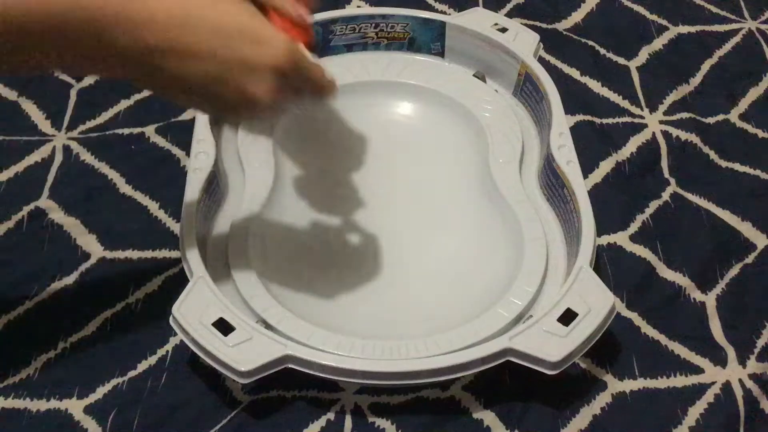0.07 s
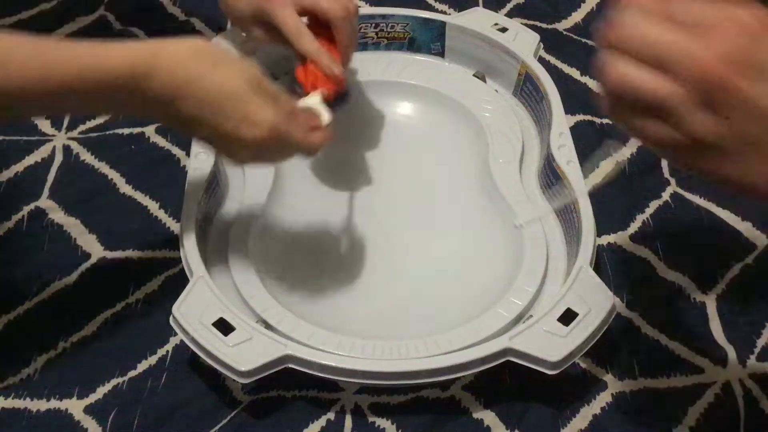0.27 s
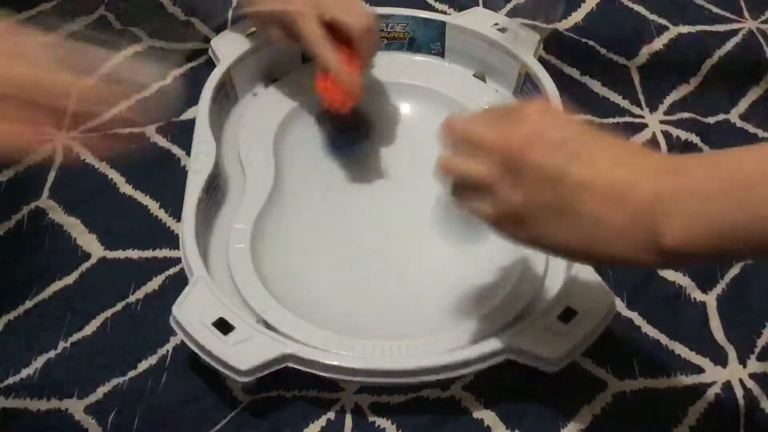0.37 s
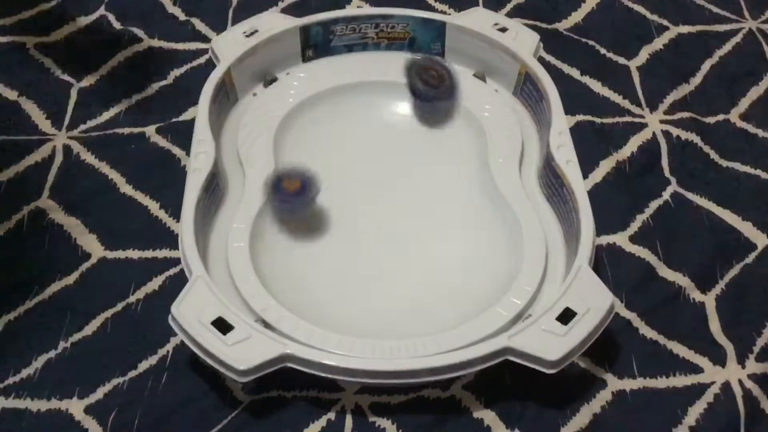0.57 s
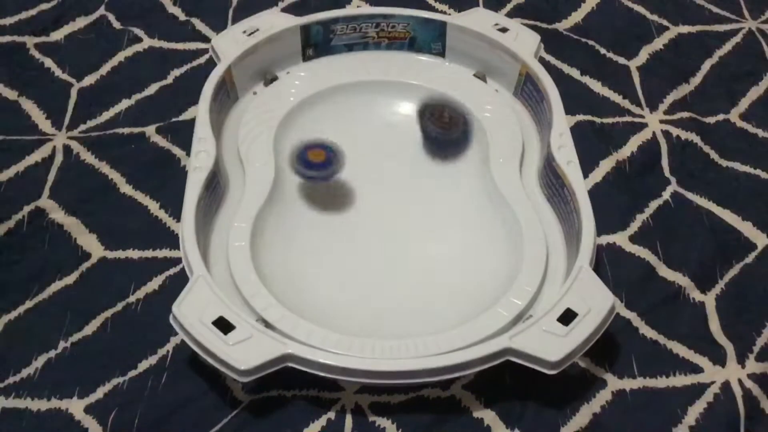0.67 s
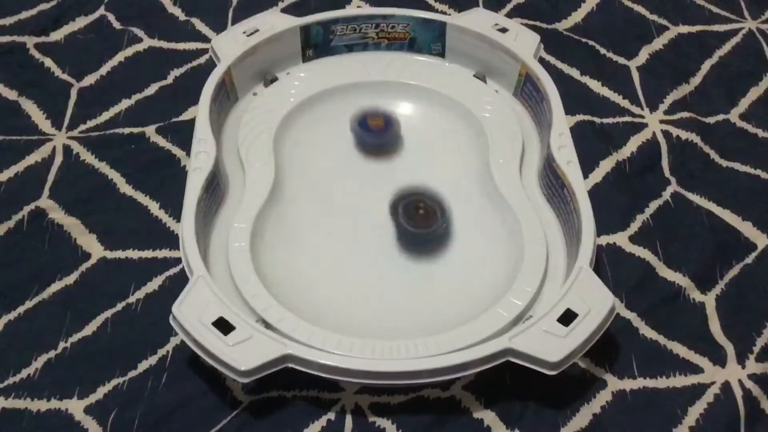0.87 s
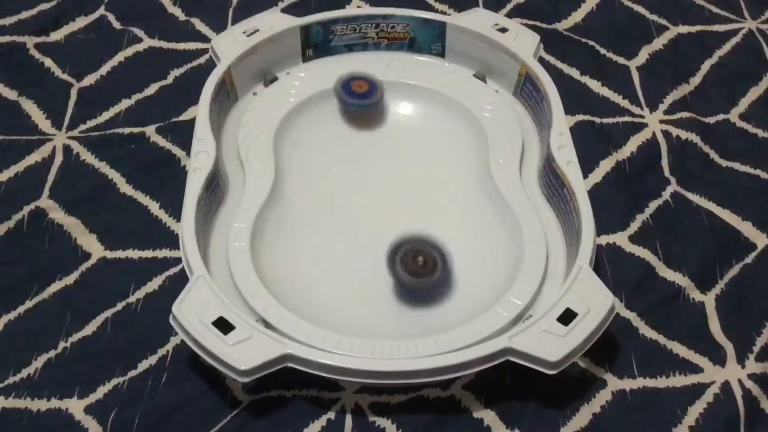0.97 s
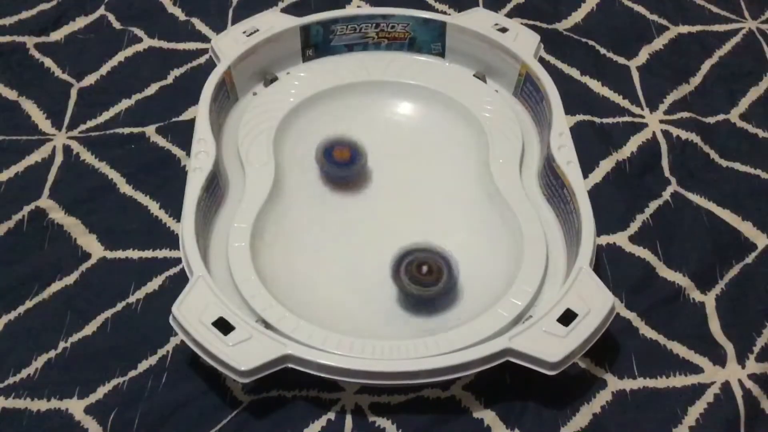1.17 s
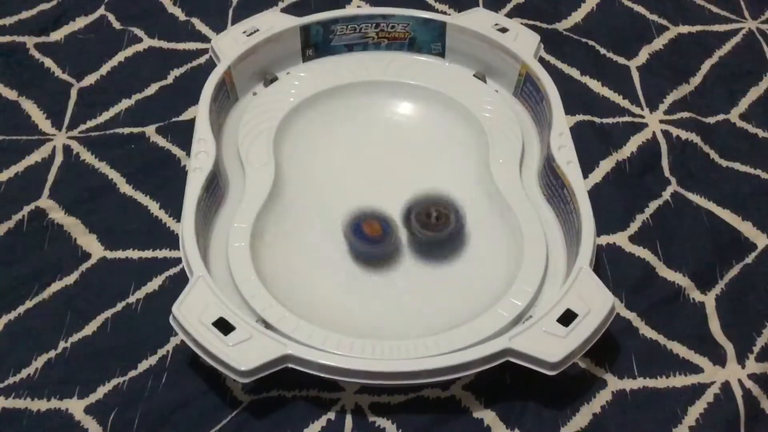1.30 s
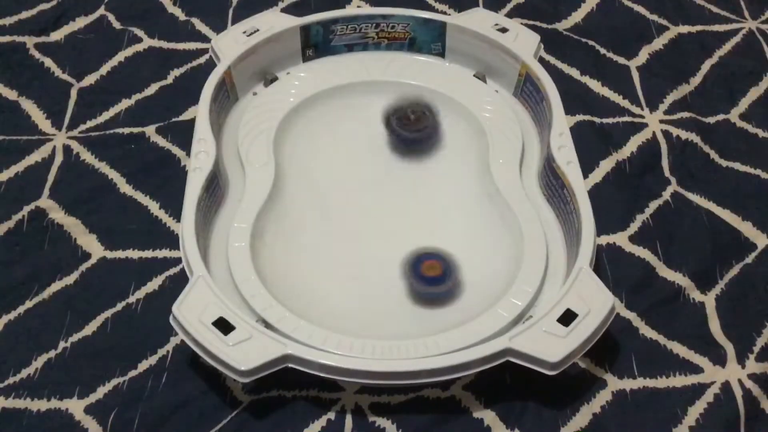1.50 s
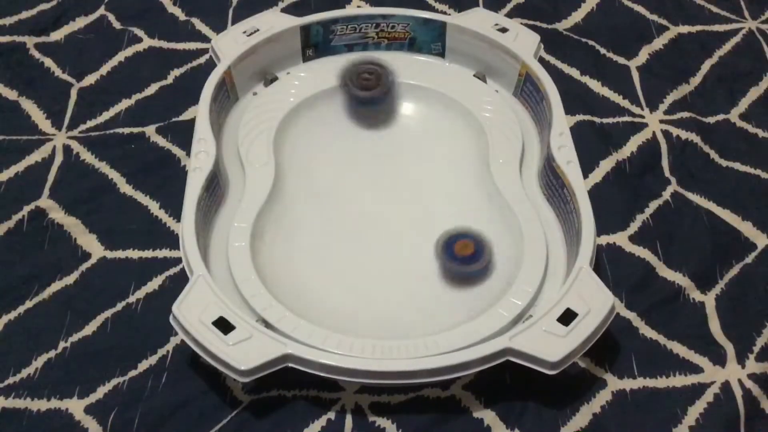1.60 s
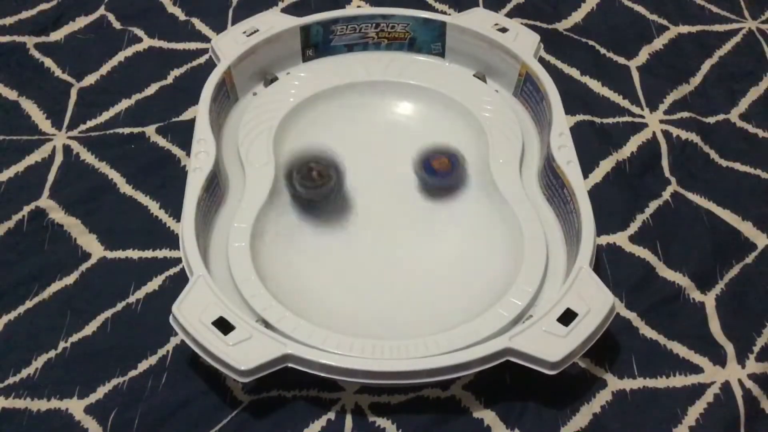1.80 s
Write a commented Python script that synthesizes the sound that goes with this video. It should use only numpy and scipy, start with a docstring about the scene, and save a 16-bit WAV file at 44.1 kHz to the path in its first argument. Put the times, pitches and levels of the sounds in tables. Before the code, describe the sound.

Two toy tops clatter into a plastic bowl after a ripcord rasp, spinning and knocking together.

```python
"""Two toy tops are ripped from their launchers into a thin plastic arena on a cloth, in a small room.
The ripcords rasp over their gears, faster and louder, and the arena takes two big, dull bumps.
The tops land and bounce, ringing the floor of the bowl, and a launcher's catch snaps once.
Then the tips rumble, scratch and skid round the bowl, with softer bumps underneath,
while the tops clack against each other and the wall."""
import sys
import numpy as np
from scipy import signal
from scipy.fft import rfft, irfft
from scipy.io import wavfile
from scipy.ndimage import uniform_filter1d

SR = 44100
rng = np.random.default_rng(int(sys.argv[2]) if len(sys.argv) > 2 else 0)


def master_out(mix):
    """Clip the mix to full scale and print it as 16-bit PCM to the path in sys.argv[1]."""
    frames = np.transpose(np.atleast_2d(mix))
    ceiling = np.clip(frames, -1, 1)
    pcm = np.round(ceiling * 32767).astype(np.int16)
    wavfile.write(sys.argv[1], SR, pcm)


N = 81585
TIME = np.arange(N) / SR
HIT_TIME = np.arange(SR // 2) / SR  # seconds within one hit and its decay

# Bright spectrum of hard contact on plastic: frequency_hz, level_db
TICK_SPECTRUM = [(500, -38), (2500, 11), (5300, 5.5), (16000, -14.5)]


def clacks():
    """Each blow ticks, rings a top and sends a falling bending wave through the wall and back."""
    # Blows of the tops: start_s, top_db, wall_db, tick_db, top_pitch_ratio
    blows = [(0.316, -12, -16.5, -15, 0.94), (.391, -26, -28, -30, 0.82), (0.4415, -21.5, -21.5, -49, 1.17),
             (0.4439, -19.5, -21.5, -29, 1.23), (.466, -28, -36, -40, 1.27), (0.4752, -18.5, -19, -57, 0.8),
             (0.49, -22, -25, -24.5, 1), (0.497, -17, -15.5, -24.5, .95), (.515, -27, -20, -55, 1.4),
             (.560, -15, -13, -20.5, 1.13), (0.568, -12, -24.5, -16, 1.05), (.573, -23, -16, -19, 1.61),
             (.583, -29, -15, -20.5, 1), (0.899, -14.5, -36, -30, 1), (.9022, -14, -10, -48, 0.74),
             (.949, -9.5, -19.5, -25.5, 0.93), (0.954, -36, -17.5, -33, 0.94),
             (1.5007, -24.5, -23, -32, 0.94), (1.5269, -20, -29.5, -43, 0.98),
             (1.535, -24.5, -26, -28.5, 1.12), (1.5619, -22, -29.5, -29, 1.21)]
    # Modes of a top: pitch_hz, level_db, t60_s
    top_modes = [(2234, -3, 0.021), (2897, 5.5, 0.011), (3640, -8, 0.012), (5380, -15, 0.013)]
    # Modes of the arena wall: pitch_hz, level_db, t60_s
    wall_modes = [(1145, 9, 0.048), (1207.6, 10, 0.038), (1640, 0, 0.093), (2162, -9, 0.1)]
    # Tone of the wall's bending wave and dense ringing: frequency_hz, level_db
    wall_spectrum = [(60, -38), (220, -2), (1300, 0), (2400, -2.5), (3600, -9.5), (5000, -20),
                     (16000, -57.5)]
    travel_s, rim_delay_s = 0.001536, 0.002207  # travel time at 1 kHz; treble arrives first
    size = len(HIT_TIME)
    hz = np.fft.rfftfreq(size, 1 / SR)
    direct = np.exp(-4j * np.pi * travel_s * np.sqrt(1000 * hz))
    rim_echo = amp(-9) * direct ** 2 * np.exp(-2j * np.pi * hz * rim_delay_s)  # smeared twice as long
    bend = crest(irfft(rfft(response(wall_spectrum), size) * (direct + rim_echo), size))
    wall_ring = amp(-10.5) * ring(wall_modes)
    attack = 1 - np.exp(-HIT_TIME / 0.00094)
    out = np.zeros(N)
    for start_s, top_db, wall_db, tick_db, pitch_ratio in blows:
        wash = amp(-5.5) * burst(wall_spectrum, t60_s=0.092) * attack
        add(out, start_s - 0.001, amp(wall_db) * (bend + wall_ring + wash))
        top = ring(top_modes, pitch_ratio, rise_s=0.00061)
        tick = crest(burst(TICK_SPECTRUM, t60_s=0.016) * attack)
        add(out, start_s, amp(top_db) * top + amp(tick_db) * tick)
    return out


def ripcords():
    """Gear teeth scuff the cord, faster and louder on a harder pull; the housing colours the rasp."""
    # Strength of the pull: time_s, level_db
    pull = [(.136, -96), (.139, -52), (.148, -64), (.172, -59.5), (.183, -47), (.233, -34), (.236, -25),
            (.27, -25), (.273, -16), (.303, -15.5), (.318, -22), (.35, -37), (.38, -110)]
    # Tone of the launcher housing: frequency_hz, level_db
    housing_spectrum = [(150, -28.5), (1800, -26), (2550, -7.5), (3700, -7), (4300, -10), (6600, -10),
                        (7900, -8.5), (8700, -14), (16000, -19)]
    peak_teeth_per_s, db_per_doubling = 370, 19.5
    tooth_spread_db, tooth_t60_s, cord_rub = 9.5, 0.016, 0.97
    pull_db = curve(pull)
    teeth_per_s = peak_teeth_per_s * 2 ** ((pull_db - pull_db.max()) / db_per_doubling)
    clicks = np.diff(np.floor(np.cumsum(teeth_per_s) / SR), prepend=0)
    teeth = clicks * np.sqrt(SR / teeth_per_s) * amp(tooth_spread_db * (2 * rng.random(N) - 1.5))
    scuff = np.exp(-2 * np.log(1000) * HIT_TIME / tooth_t60_s)
    power = abs(signal.fftconvolve(teeth ** 2, scuff / scuff.sum())[:N]) + cord_rub ** 2
    friction = rng.standard_normal(N) * np.sqrt(power) * amp(pull_db)
    housing = response(housing_spectrum)
    rasp = signal.fftconvolve(friction, housing / np.linalg.norm(housing))[:N]
    return resonant(rasp, hz=7320, width_hz=210, db=-11)  # the gear case sings under the rasp


def bumps():
    """Soft blows shake the whole arena and hold no treble."""
    # Dull bumps: start_s, level_db, pitch_ratio
    blows = [(0.275, -24.5, 0.33), (0.309, -5, 0.87), (0.3603, -4.5, 0.93), (0.613, -21, 0.95),
             (0.657, -16.5, 0.65), (1.115, -25, 0.63), (1.157, -21.5, 0.58), (1.574, -18, 0.845)]
    # Modes of the whole arena: pitch_hz, level_db, t60_s
    arena_modes = [(105.2, -14, 0.48), (168.6, 9, 0.029), (249.6, 14.5, 0.021), (321, 6, 0.033),
                   (498, 1, 0.083), (650, 2, 0.058)]
    out = np.zeros(N)
    for start_s, level_db, pitch_ratio in blows:
        add(out, start_s, amp(level_db) * ring(arena_modes, pitch_ratio, rise_s=0.0014))
    return signal.sosfilt(signal.butter(8, 730, "lowpass", fs=SR, output="sos"), out)


def landings():
    """The falling tips strike the floor of the bowl and ring it."""
    # Strikes of the tips: start_s, level_db, pitch_ratio
    strikes = [(.498, -13, 0.96), (.5605, -16, .89)]
    # Modes of the floor: pitch_hz, level_db, t60_s
    floor_modes = [(658, -3.5, 0.17), (686, 2.5, 0.055), (820, -16, 0.032)]
    out = np.zeros(N)
    for start_s, level_db, pitch_ratio in strikes:
        add(out, start_s, amp(level_db) * ring(floor_modes, pitch_ratio, rise_s=0.0011))
    return out


def snap():
    """A launcher's catch lets out one bright plastic snap."""
    # Tone of the catch: frequency_hz, level_db
    catch_spectrum = [(200, -21.5), (2300, -11), (2750, 6.5), (3550, 2), (4100, -2), (7500, 0), (16000, -8)]
    out = np.zeros(N)
    add(out, start_s=0.756, sound=amp(-13.5) * burst(catch_spectrum, t60_s=0.016))
    return out


def rolling():
    """The spinning tips jolt the bowl, scratch once per turn and tick over grit."""
    # Levels of the running tips: time_s, rumble_db, scratch_db
    levels = [(.25, -62, -100), (.4, -27, -43), (.62, -33.5, -49.5), (.76, -34.5, -49), (.88, -33, -46.5),
              (1.02, -30, -47.5), (1.1, -39.5, -52), (1.27, -41, -54.5), (1.39, -36, -52),
              (1.48, -27.5, -48.5), (1.6, -30.5, -48), (1.77, -40.5, -53.5), (1.83, -28, -49)]
    # Low rumble of the bowl: frequency_hz, level_db
    rumble_spectrum = [(48, -21), (80, 1), (125, 2.5), (230, -5), (390, -12.5), (620, -15), (800, -39),
                       (2000, -52)]
    # Scratch of a tip on plastic: frequency_hz, level_db
    scratch_spectrum = [(900, -0.5), (1220, 7.5), (1550, -3.5), (2800, -0.5), (7500, -18.5), (16000, -27)]
    spin_hz, spin_depth, jolt_share, grit_db = 54.1, 0.52, 0.53, -11.5
    jolts = unit(colour(sparse(per_s=63, spread_db=3), rumble_spectrum))
    smooth_roll = unit(colour(rng.standard_normal(N), rumble_spectrum))
    rumble = unit(jolt_share * jolts + (1 - jolt_share) * smooth_roll)
    wander = unit(uniform_filter1d(rng.standard_normal(N), size=1500))
    turns = np.cumsum(spin_hz * (1 + 0.2 * wander)) / SR
    flutter = np.exp(spin_depth * np.cos(2 * np.pi * turns))
    scratch = unit(colour(rng.standard_normal(N) * flutter, scratch_spectrum))
    grains = sparse(per_s=200, spread_db=4)
    grit = unit(signal.fftconvolve(grains, burst(TICK_SPECTRUM, t60_s=0.0062))[:N])
    return amp(curve(levels)) * rumble + amp(curve(levels, column=2)) * (scratch + amp(grit_db) * grit)


def skids():
    """A tip catches on the plastic in short, dry scrapes."""
    # Scrapes: start_s, level_db
    scrapes = [(0.6524, -45), (0.678, -37), (0.7083, -44.5), (1.1154, -45.5), (1.155, -45.5), (1.16, -45.5),
               (1.335, -48.5), (1.4494, -44), (1.4765, -39.5), (1.8107, -48)]
    out = np.zeros(N)
    for start_s, level_db in scrapes:
        add(out, start_s, amp(level_db) * burst(TICK_SPECTRUM, t60_s=0.02))
    return out


def room(x, tails=3, crossfade_hz=7.14):
    """Several echo tails crossfade in turn, so the room's short reverb sounds smooth and even."""
    feeds = [np.cos(np.pi * (crossfade_hz * TIME + k / tails)) * np.sqrt(2 / tails)
             for k in range(tails)]
    return sum(signal.fftconvolve(x * feed, room_tail())[:N] for feed in feeds)


def room_tail():
    """One short echo tail of a furnished room, made of decaying noise."""
    # Reverb decay: frequency_hz, t60_s
    decay_times = [(200, 0.21), (3000, 0.21), (16000, 0.19)]
    # Reverb send: frequency_hz, level_db
    send = [(100, -14), (700, -3), (2500, -10.5), (16000, -3.5)]
    hz, t, bands = signal.stft(rng.standard_normal(len(HIT_TIME)), SR, nperseg=256)
    t60_s = read(decay_times, hz)[:, None]
    decay = np.exp(-np.log(1000) * t / t60_s) * np.sqrt(2 * np.log(1000) / (t60_s * SR))  # unit energy
    bands = bands * decay * amp(read(send, hz))[:, None]
    tail = signal.istft(bands, SR, nperseg=256)[1][:len(HIT_TIME)]
    return tail * (1 - np.exp(-HIT_TIME / 0.0015))


def air():
    """The room's still air is a faint, low bed of noise."""
    # Room tone: frequency_hz, level_db
    air_spectrum = [(20, -20.5), (68, 2), (500, -19), (2500, -31.5), (16000, -57.5)]
    return amp(-51) * unit(colour(rng.standard_normal(N), air_spectrum))


def ring(modes, pitch_ratio=1, rise_s=0.0009):
    """Modes struck together, each dying at its own speed."""
    waves = sum(amp(db - 60 * HIT_TIME / t60_s) * np.sin(2 * np.pi * hz * pitch_ratio * HIT_TIME)
                for hz, db, t60_s in modes)
    return crest(waves * (1 - np.exp(-HIT_TIME / rise_s)))


def burst(spectrum, t60_s):
    """Countless modes dying together as a puff of noise."""
    decay = np.exp(-np.log(1000) * HIT_TIME / t60_s)
    return crest(colour(rng.standard_normal(len(HIT_TIME)) * decay, spectrum))


def sparse(per_s, spread_db):
    """Random clicks of uneven size."""
    return (rng.random(N) < per_s / SR) * amp(spread_db * np.minimum(rng.exponential(1, N), 3))


def resonant(x, hz, width_hz, db):
    """Adds one narrow resonance to a sound."""
    return x + amp(db) * signal.lfilter(*signal.iirpeak(hz, hz / width_hz, fs=SR), x)


def colour(x, spectrum):
    """Filters a sound by a spectrum."""
    return signal.fftconvolve(x, response(spectrum))[:len(x)]


def response(spectrum, size=4096):
    """Causal impulse response with the given spectrum."""
    log_gain = np.log(amp(read(spectrum, abs(np.fft.fftfreq(size, 1 / SR)))))
    return np.fft.ifft(np.exp(np.conj(signal.hilbert(log_gain)))).real[:size // 2]


def read(points, hz):
    """Reads a table on a log-frequency axis."""
    point_hz, value = np.transpose(points)
    return np.interp(np.log(hz + 1), np.log(point_hz + 1), value)


def curve(rows, column=1):
    """Reads one column of a control curve at every sample."""
    rows = np.array(rows)
    return np.interp(TIME, rows[:, 0], rows[:, column])


def add(mix, start_s, sound):
    """Mixes a sound in at its start time."""
    part = mix[max(round(start_s * SR), 0):][:len(sound)]
    part += sound[:len(part)]


def amp(db):
    """Decibels to gain."""
    return 10 ** (np.asarray(db) / 20)


def unit(x):
    """Scales to rms 1."""
    return x / np.sqrt(np.mean(x ** 2) + 1e-20)


def crest(x):
    """Scales so that the loudest two milliseconds have rms 1."""
    return x / np.sqrt(uniform_filter1d(x ** 2, size=88).max() + 1e-20)


def scene():
    """Launchers, tops and arena, mixed in mono with the room's echo and air."""
    bowl = resonant(bumps() + landings() + rolling(), hz=335.2, width_hz=19.5, db=2)  # its hollow note
    sources = ripcords() + clacks() + snap() + skids() + bowl
    return (sources + room(sources) + air())[None]


def record(dry):
    """The microphone's bass cut, full-scale clipping, then the band limit."""
    low_cut_hz, high_cut_hz = 72, 15900
    bass_cut = signal.butter(3, low_cut_hz, "highpass", fs=SR, output="sos")
    clipped = np.clip(signal.sosfilt(bass_cut, dry), -1, 1)
    band_limit = signal.firwin(511, high_cut_hz, window=("kaiser", 9), fs=SR)
    return signal.oaconvolve(clipped, band_limit[None], "same")


dry = scene()
out = record(dry)
master_out(out)
```